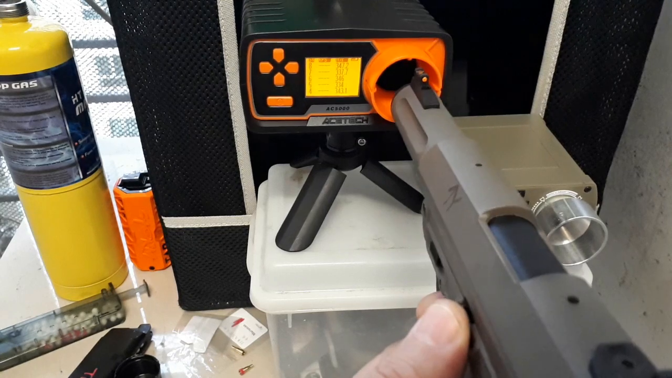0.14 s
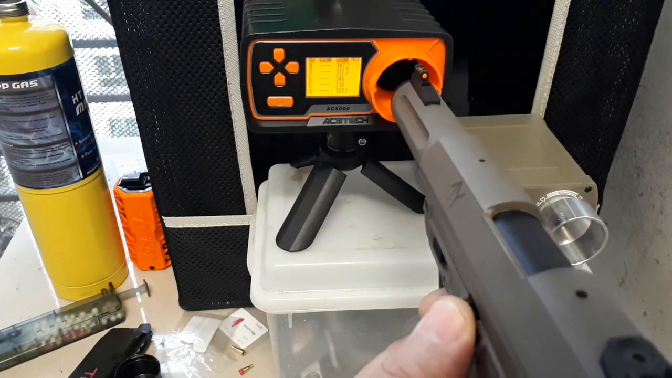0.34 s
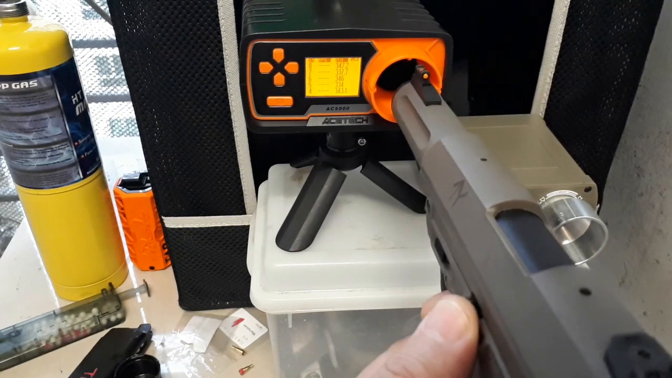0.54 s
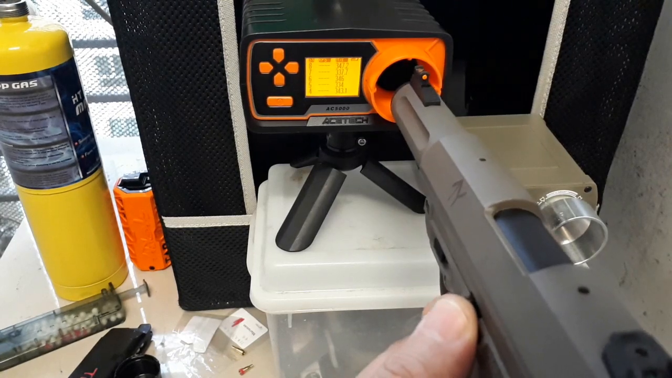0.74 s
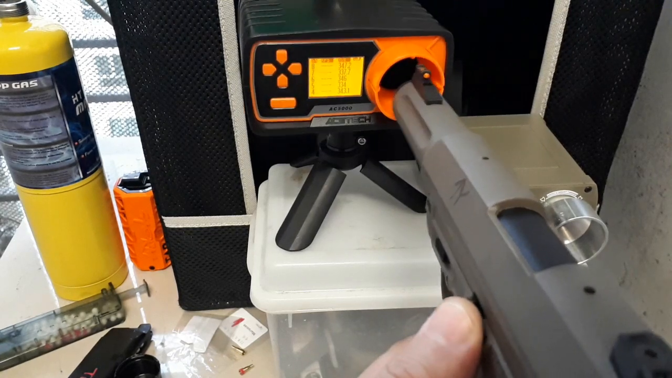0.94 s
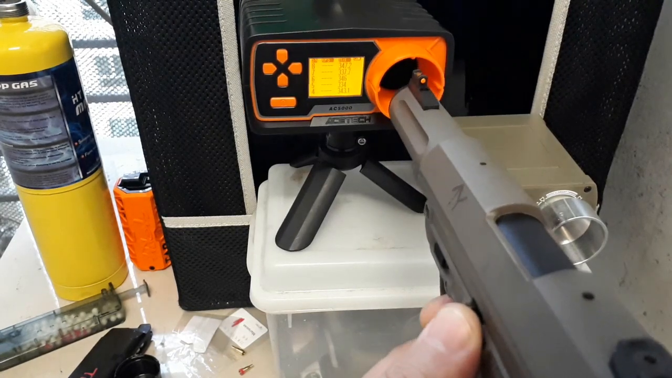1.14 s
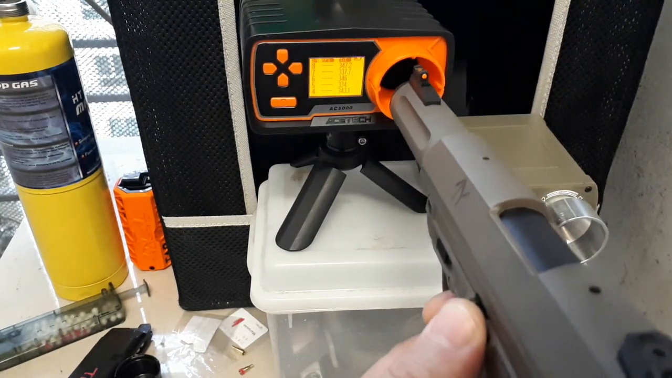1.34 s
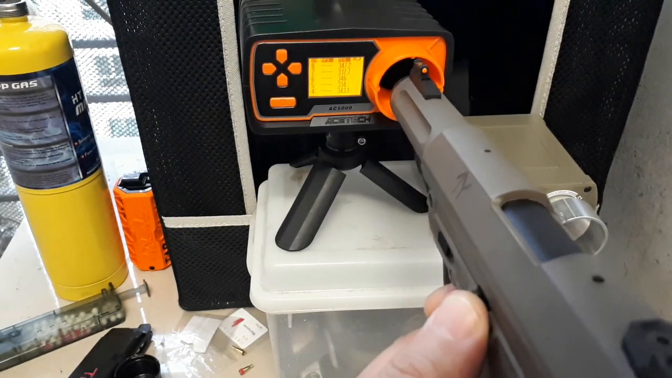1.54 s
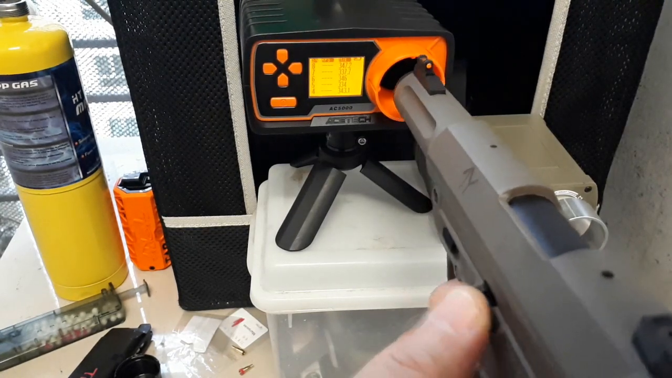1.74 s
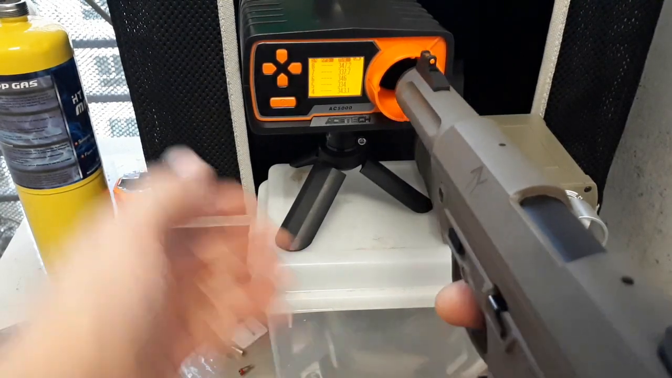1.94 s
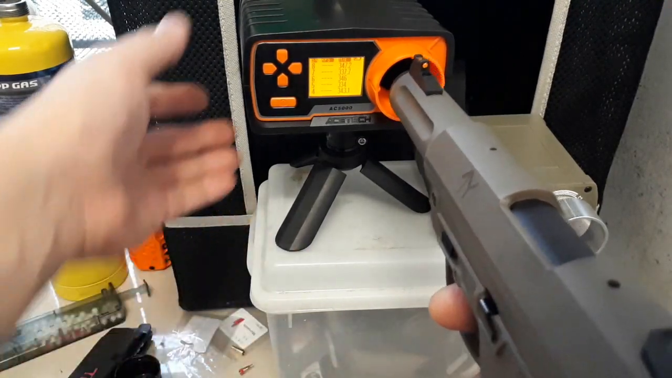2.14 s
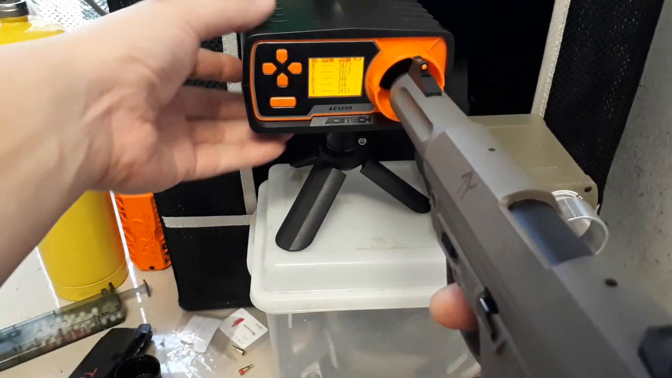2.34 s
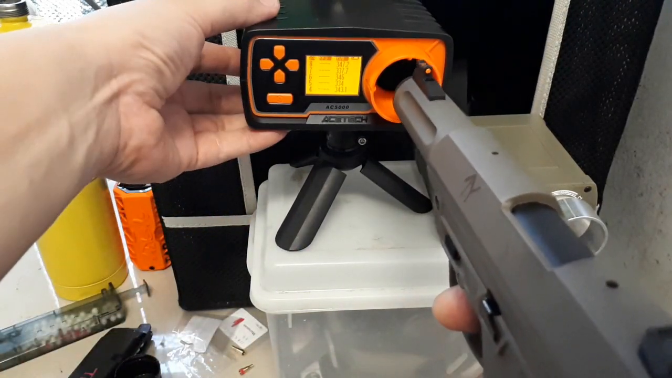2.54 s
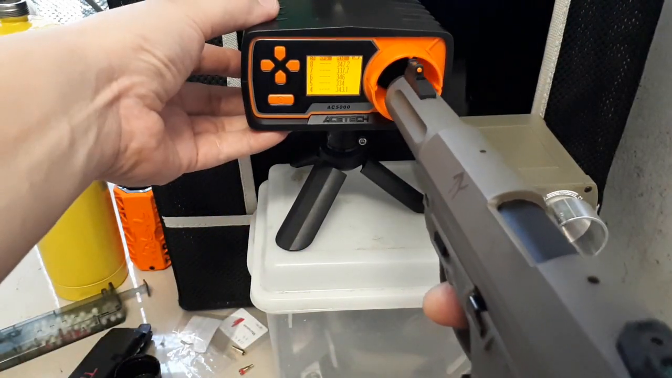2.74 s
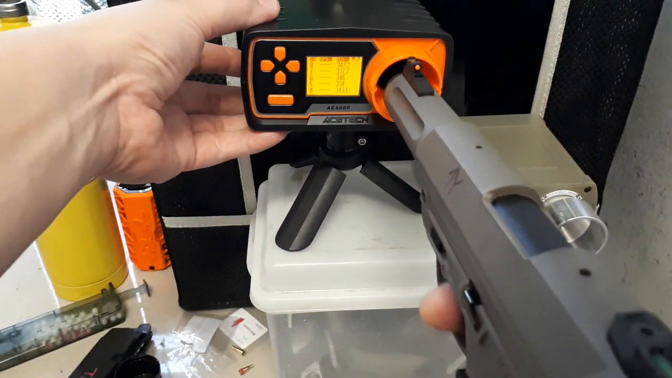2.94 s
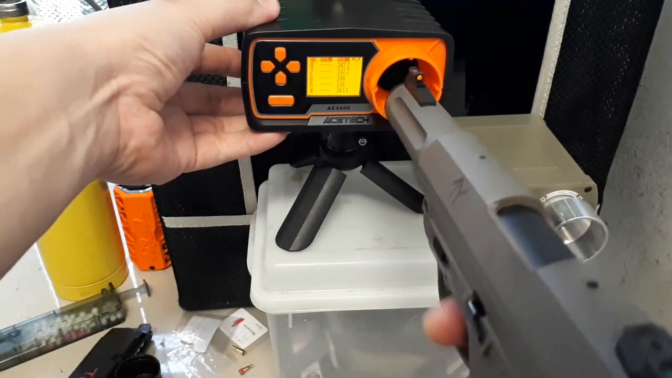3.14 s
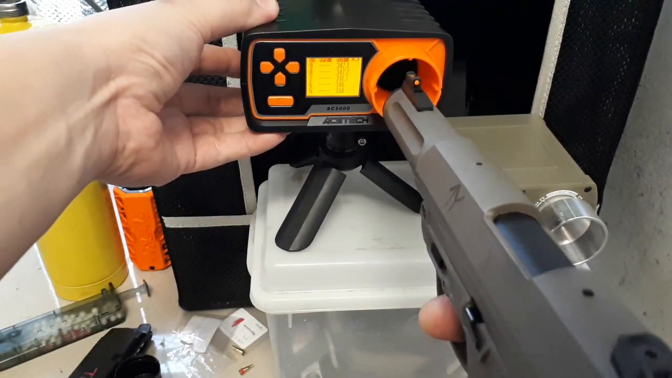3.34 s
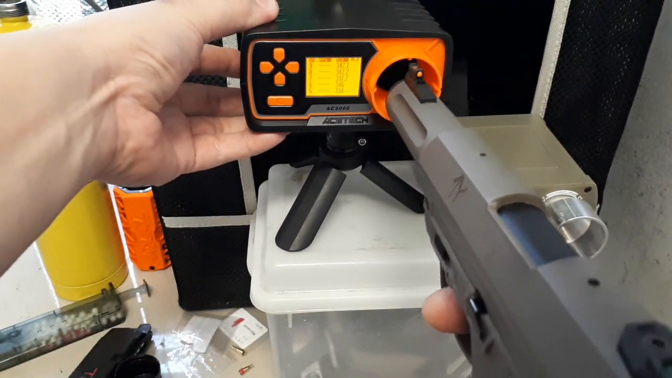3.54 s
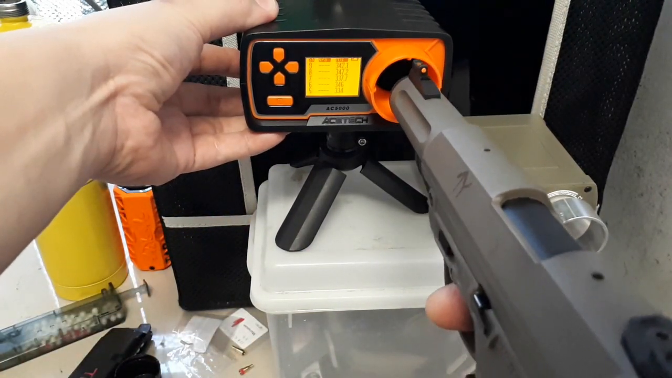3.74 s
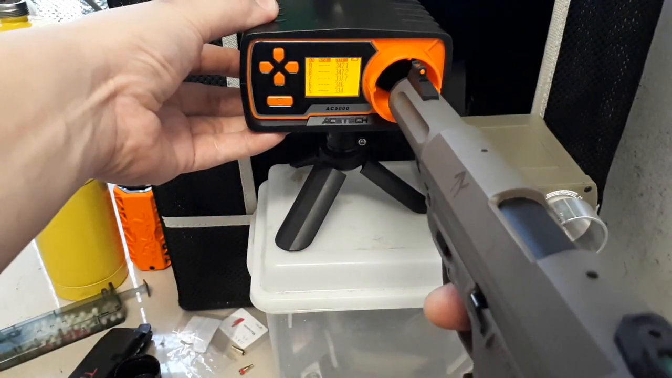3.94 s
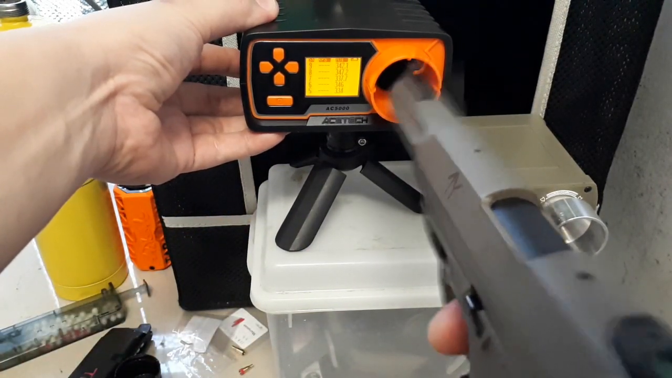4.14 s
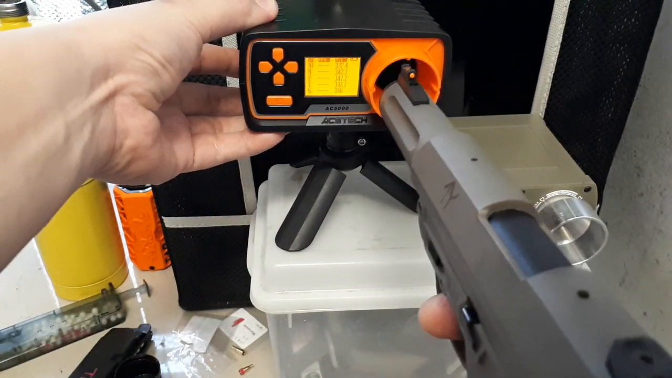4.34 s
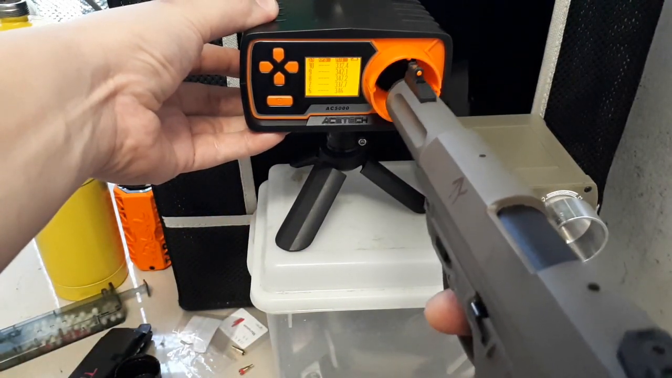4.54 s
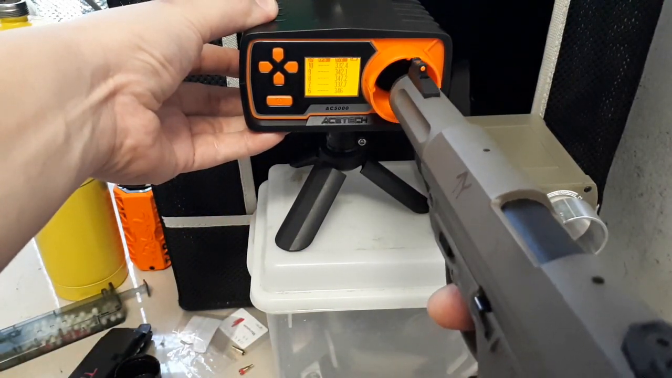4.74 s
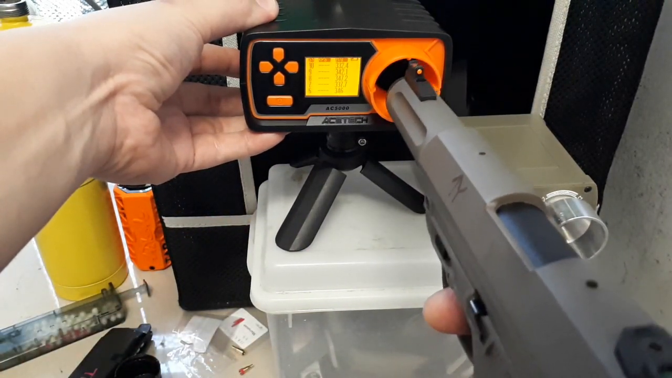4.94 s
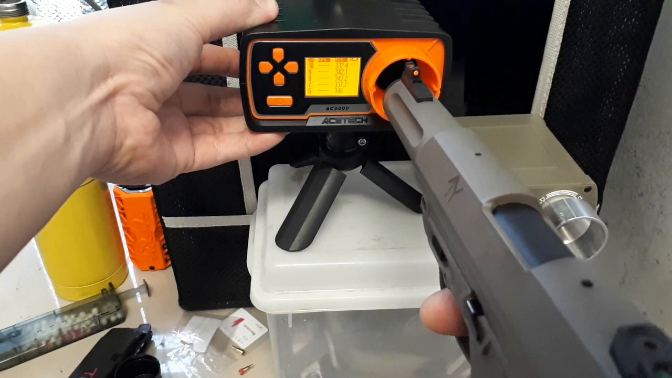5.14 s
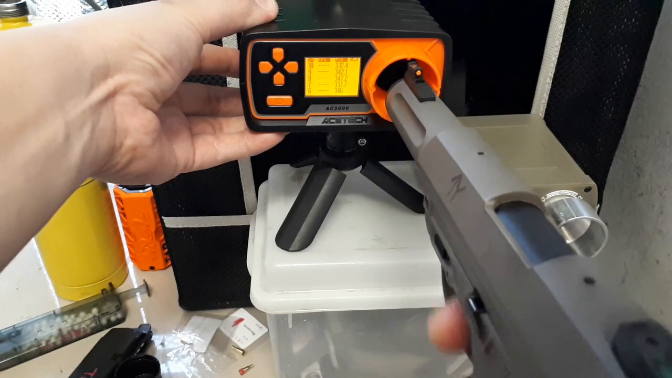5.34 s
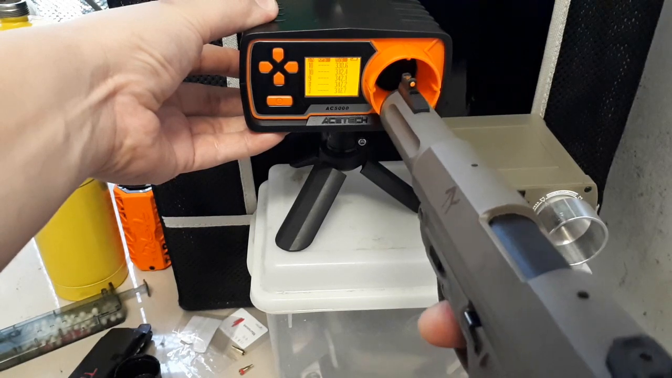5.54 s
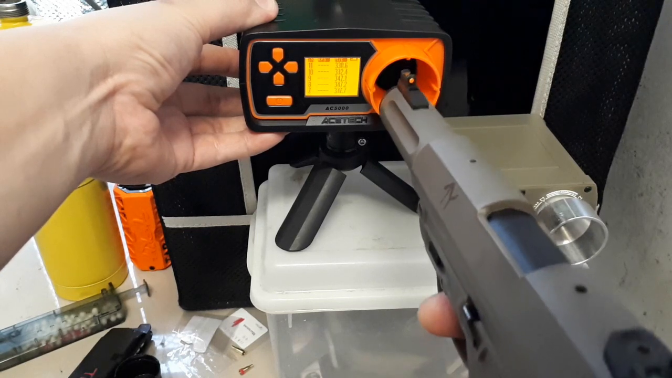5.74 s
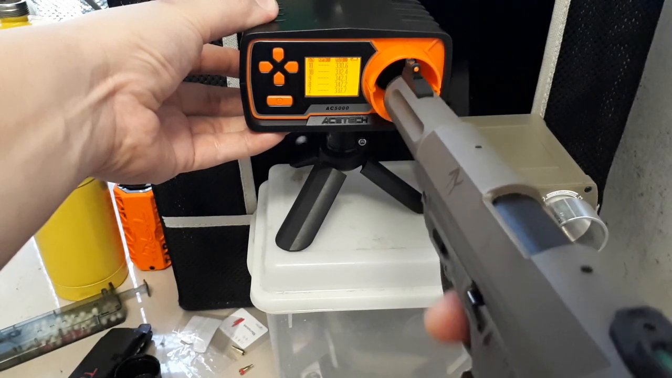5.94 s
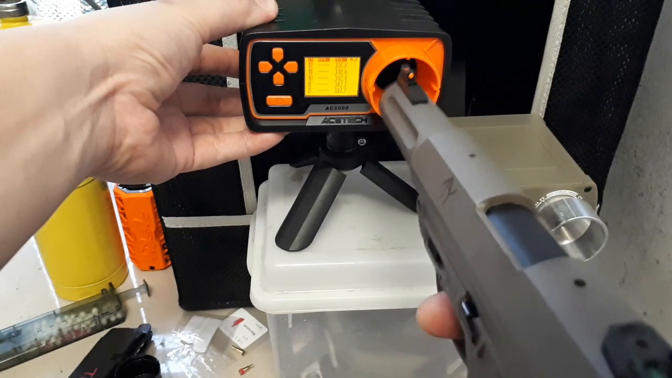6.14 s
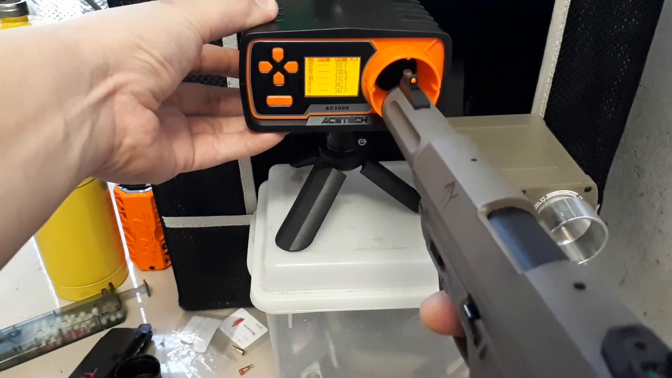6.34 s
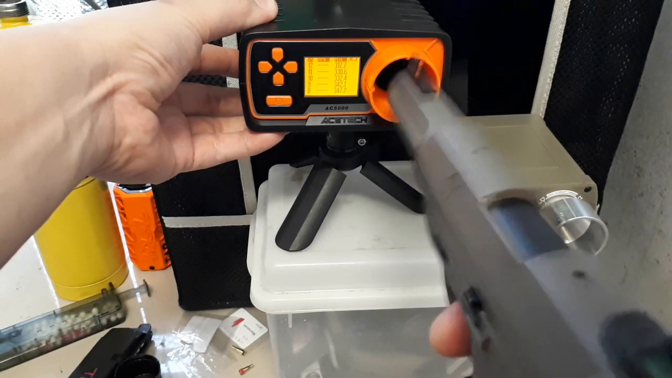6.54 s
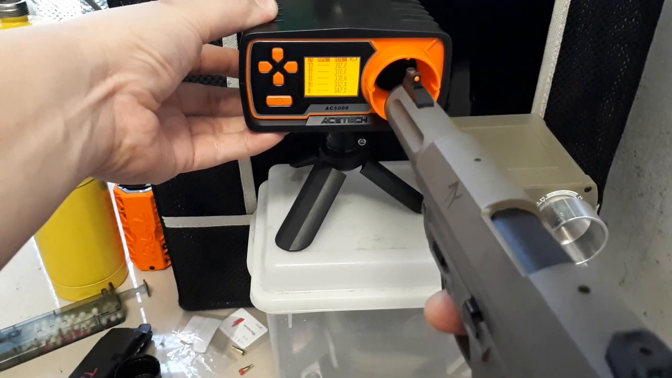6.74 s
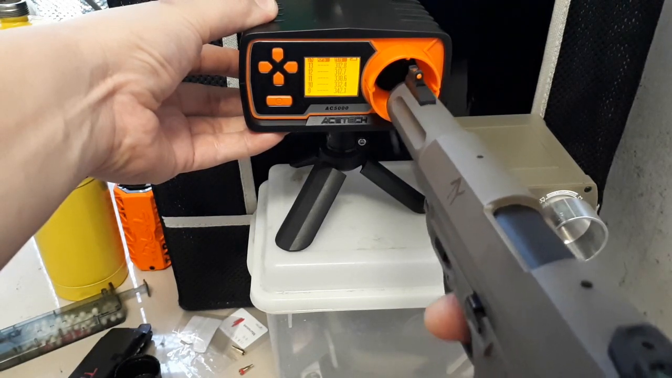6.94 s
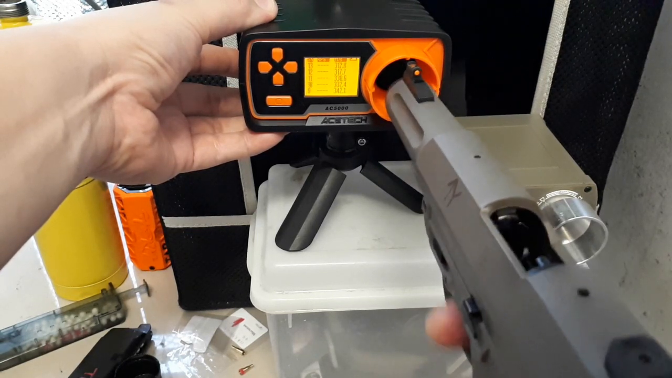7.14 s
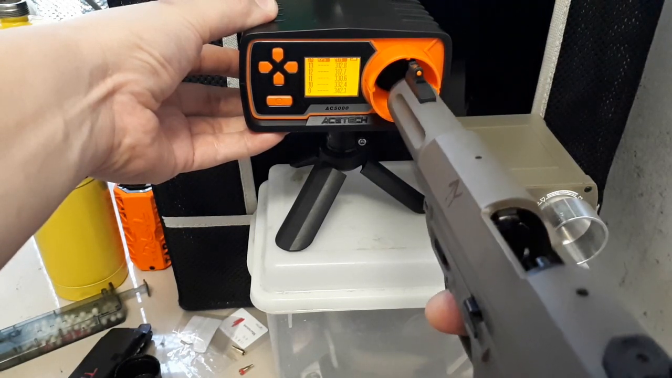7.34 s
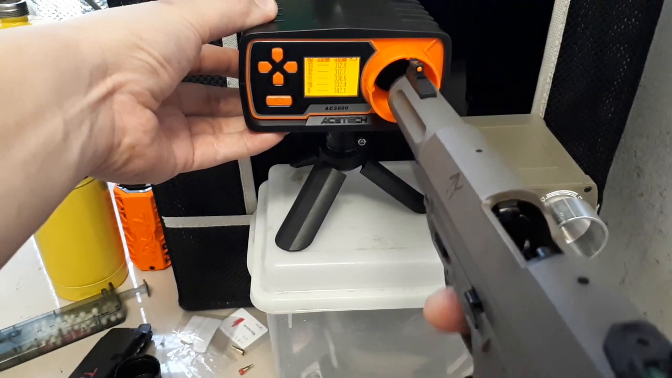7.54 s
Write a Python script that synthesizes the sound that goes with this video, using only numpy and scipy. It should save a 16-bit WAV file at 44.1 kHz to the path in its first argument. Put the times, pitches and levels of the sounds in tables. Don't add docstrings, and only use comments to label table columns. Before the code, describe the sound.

A small, cluttered room with low, soft far-traffic hum and very faint hiss; a trigger click and the dim ringing tail of an earlier shot open the scene. At 0.9 s a gas toy pistol fires close to the microphone: tiny hammer tick, explosive bright burst, dull slide knock, then a metallic clack about 0.13 s later, with short boxy ringing and a faint stairwell tail. A bright trigger click follows at 1.4 s. Through the pause the hum swells, with barely audible squeaks and a faint cloth brush near 2.6 s. More bangs come at 3.1 and 4.2 s, with clicks at 3.6 and 4.7 s. A small creak precedes the shot at 5.4 s, then rapid shots at 6.0, 6.6 and 7.1 s. Clicks come at 5.9 and just before the last shot; a final release clicks at 7.6 s. Blasts sound limited and gently clipped.

```python
import sys
import numpy as np
from scipy import signal
from scipy.fft import rfft, irfft, next_fast_len
from scipy.io import wavfile
from scipy.ndimage import uniform_filter1d, minimum_filter1d

SR = 44100
rng = np.random.default_rng(int(sys.argv[2]) if len(sys.argv) > 2 else 0)


def volts(x):
    e = np.asarray(x, float) / 20
    return 10 ** e


def master(y):
    cut = np.clip(np.atleast_2d(y).T, -1, 1)
    pcm = np.round(cut * 32767)
    wavfile.write(sys.argv[1], SR, pcm.astype(np.int16))


N = 335601

# start in seconds, blast peak in dB, hammer tick ahead in seconds,
# slide home after in seconds, force of the slide on its rear stop in dB.
SHOTS = [
    (.918, -3.5, .0375, .1353, -4.5),
    (3.085, -6.5, .0374, .1412, -15),
    (4.1617, -5.5, .0381, .1305, -5),
    (5.435, -7.5, .0328, .1294, -7),
    (6.0441, -4.5, .0318, .1217, -6.5),
    (6.572, -3.5, .0349, .1193, -6),
    (7.0952, -4, .035, .1248, -13.5),
]
# start in seconds, peak in dB, brightness in dB.
TRIGGER_RESETS = [
    (0.001, -35, 3.5),
    (1.361, -28, 12),
    (3.558, -30.5, -0.5),
    (4.653, -29, 3),
    (5.925, -31, 1),
    (7.042, -29, -2.5),
    (7.59, -30.5, 0.5),
]
# start in seconds, peak
# in dB, brightness in # dB.
CREAKS = [
    (2.8156, -60, -0.5),
    (2.9333, -62, 2),
    (5.393, -53.5, -4),
    (5.4029, -42, -4.5),
]
# start in seconds, length in seconds, first pitch in Hz,
# last pitch in Hz, level in dB.
SQUEAKS = [
    (1.15, .03, 3340, 3360, -64),
    (1.267, 0.033, 3200, 3250, -63.5),
    (1.82, 0.13, 2800, 2780, -71.5),
    (2.092, 0.27, 2650, 2650, -80),
    (2.45, 0.19, 3630, 3590, -83),
    (3.677, 0.28, 5200, 5450, -88),
    (3.895, 0.3, 2637, 2790, -75),
]
# climb start in seconds, climb time in seconds, height in dB, time
# in seconds, close to a shot, from which it holds briefly and then falls.
GAIN_SWELLS = [
    (-.6, .3, 12.5, -0.0968),
    (1.95, 0.38, 14, 3),
    (5.26, 0.21, 11.5, 5.5),
]

# frequency in Hz, level in dB per Hz.
GAS_COLOUR = [(25, -50), (70, -30), (130, -13), (300, -4.5), (600, -6), (800, -1), (1400, -0.5),
              (3200, -2.5), (3900, -11), (5500, -15), (9800, -17.5), (12300, -11.5), (15300, -20),
              (16500, -33.5)]
# frequency in Hz, level in dB per Hz.
STOP_COLOUR = [(300, -25), (1000, -7), (2000, 2), (3400, -2.5), (4500, -15), (12000, -26), (16500, -32)]
# frequency in Hz, level in dB per Hz.
METAL_COLOUR = [(300, -33.5), (700, -9), (1400, -2), (2300, -5), (3000, -8), (6500, -13.5), (9000, -11.5),
                (12500, -2), (15500, -9), (16500, -20)]
# frequency in Hz, level in dB per Hz.
SEAR_COLOUR = [(290, -38), (500, -7), (1190, -6.5), (1660, -0.5), (1890, 0), (5190, -10), (7170, -7.5),
               (9740, -17.5), (11600, -12), (15100, -16.5), (16500, -29.5)]
# frequency in Hz, level in dB per Hz.
HUM_COLOUR = [(12, -55), (20, -19.5), (48, -9), (86, -3.5), (135, 1), (244, -6.5), (382, -15), (440, -14),
              (535, -22.5), (709, -14), (1180, -21.5), (2660, -30), (4530, -50.5), (15200, -61),
              (16500, -72)]
# frequency in Hz, level in dB per Hz.
AFTER_COLOUR = [(300, -11), (1000, -4.5), (3300, 2), (4500, -9.5), (7000, -14.5), (10000, -30.5),
                (16500, -45.5)]
# frequency in Hz, level in dB per Hz.
CLOTH_COLOUR = [(2000, -20.5), (4500, -4), (6500, -1), (7500, -12), (12000, -30.5)]

# frequency in Hz, likeness from -1 to 1.
HUM_ALIKE = [(60, 1), (130, 0.98), (290, 0.9), (640, 0.8), (1410, -0.22), (3100, 0.3), (6820, 0.7),
             (15000, 0.98)]
# frequency in Hz, likeness from -1 to 1.
ROOM_ALIKE = [(60, 0.1), (130, 0.69), (290, 0.55), (640, 0.46), (1410, 0.035), (3100, 0.3), (6820, 0.5),
              (15000, 0.85)]
# frequency in Hz, time to fall by 60 dB in seconds.
ROOM_DECAY = [(60, .2), (200, 0.34), (500, 0.23), (1500, 0.21), (4000, 0.21), (9000, 0.18), (16000, .16)]
# frequency in Hz, time to fall by 60 dB in seconds.
STAIRWELL_DECAY = [(300, 0.63), (1500, 1), (4000, 0.97), (7000, 0.8), (9000, 0.93), (14000, 0.13)]

# pitch in Hz, level in dB,
# time to fall by 60 dB in seconds, onset in seconds.
RINGS = [(142.5, -17.5, .36, .03), (208, -3.5, 0.05, .006), (260, -4.5, 0.062, .006),
         (310.5, -22, 0.16, 0.0096), (410, -24.5, 0.27, .015), (448, -21, 0.23, 0.0032),
         (607, -19.5, 0.15, .006), (743.5, -7, 0.085, .007), (866, -8.5, 0.069, 0.0069),
         (973, -11, 0.061, .006), (1355, -13.5, .06, 0.0034), (2600, -57, 0.74, .01), (3962, -51.5, 1, .01)]
# pitch in Hz, level in dB, time to fall by 60 dB in seconds.
CAN = (1705, -62, 3.5)
# pitch in Hz, level in dB, time to fall by 60 dB in seconds,
# delay in seconds.
FRAME_RINGS = [(3330, -7.5, .01, 0), (2340, -11, 0.0079, 0.0092), (1550, -11.5, 0.018, 0.0013)]
# pitch in Hz, level in dB, time to fall by 60 dB in seconds,
# delay in seconds.
BREECH_RINGS = [(1350, -11, .01, .0003)]
# pitch in Hz, level in dB, time to fall by 60 dB in seconds,
# delay in seconds.
BUFFER_RINGS = [(2000, 10, .004, 0), (3100, 5, .003, .0002)]

SLAM_AFTER_S = .037
HOME_DB, HOME_BRIGHT_DB, HAMMER_DB = -18, -0.2, -53
RINGING_DB, RATTLE_DB, PUSH_DB = 0.9, -2, -11
PUSH_PER_GAIN, RATTLE_PER_GAIN, RINGING_PER_GAIN = -0.5, .15, -0.23
PUSH_LOSS_DB = .8
REST_DB, GAIN_HOLD_S, GAIN_FALL_S = -1.3, 0.037, 0.18
BRUSH_S, BRUSH_RISE_S, BRUSH_FALL_S, BRUSH_DB = 2.65, .3, 0.08, -90.5
TOP_HZ = 15900


def along(points, hz):
    f, v = np.transpose(points)
    return np.interp(np.log(hz + 1), np.log(f + 1), v)


def unit(x):
    return x / np.sqrt(np.mean(x ** 2) + 1e-20)


def kernel(spectrum, tilt_db=0, size=2048):
    hz = np.fft.rfftfreq(size, 1 / SR)
    level_db = along(spectrum, hz) + tilt_db * np.clip(hz / 8000 - .5, 0, 1)
    cepstrum = irfft(np.log(volts(level_db) + 1e-5))
    folded = np.concatenate([cepstrum[:1], 2 * cepstrum[1:size // 2], np.zeros(size // 2)])
    knock = irfft(np.exp(rfft(folded)))
    return knock / np.linalg.norm(knock)


def pair(n, alike, spectrum=((1, 0), (2, 0))):
    m = next_fast_len(n, True)
    hz = np.fft.rfftfreq(m, 1 / SR)
    turn = np.arccos(np.clip(along(alike, hz), -1, 1)) / 2
    coloured = rfft(rng.standard_normal((2, m))) * volts(along(spectrum, hz))
    mid, side = irfft(coloured * [np.cos(turn), np.sin(turn)], m)
    return unit(np.array([mid + side, mid - side])[:, :n])


def add(track, s, sound):
    part = track[..., max(round(s * SR), 0):][..., :sound.shape[-1]]
    part += sound[..., :part.shape[-1]]


def gain_at(s):
    db = REST_DB
    for start, climb, height_db, shot in GAIN_SWELLS:
        rise = np.sin(np.pi / 2 * np.clip((s - start) / climb, 0, 1)) ** 2
        since_release = np.maximum(s - shot - GAIN_HOLD_S, 0)
        db = db + height_db * rise * np.exp(-(since_release / GAIN_FALL_S) ** 1.2)
    return db


def heard(contacts):
    return [(s, db + gain_at(s), *rest) for s, db, *rest in contacts]


def clicks(events, spectrum, t60, bounce_s, bounce_db, offset_db, modes=()):
    out, t = np.zeros(N), np.arange(SR // 10) / SR
    for s, db, *bright_db in events:
        bounce = volts(bounce_db - 60 * (t - bounce_s) / t60) * (t > bounce_s)
        shape = volts(-60 * t / t60) + bounce
        contact = shape * rng.standard_normal(len(t))
        burst = np.convolve(contact, kernel(spectrum, sum(bright_db)))[:len(t)]
        burst = burst / np.abs(burst).max()
        for hz, level_db, ring_s, delay in modes:
            age = np.maximum(t - delay, 0)
            fade = volts(level_db + rng.normal(0, 4) - 60 * age / ring_s)
            burst = burst + fade * np.sin(2 * np.pi * hz * rng.normal(1, 0.011) * age)
        add(out, s, volts(db + offset_db - gain_at(s)) * burst)
    return out


def reverb(x, t60s, seconds, count):
    out = np.zeros((2, N))
    for at in np.array_split(np.arange(N), count):
        hz, t, z = signal.stft(pair(int(seconds * SR), ROOM_ALIKE), SR, nperseg=256)
        fading = z * volts(-60 * t / along(t60s, hz)[:, None])
        tail = signal.istft(fading, SR, nperseg=256)[1]
        tail = tail / np.sqrt(np.sum(tail ** 2) / 2)
        add(out, at[0] / SR, signal.fftconvolve(x[:, at], tail, axes=1))
    return out


def traffic_hum():
    z = signal.stft(pair(N, HUM_ALIKE, HUM_COLOUR), nperseg=512)[2]
    patches = rng.standard_normal(z.shape[1:])
    patches = uniform_filter1d(uniform_filter1d(patches, 5, 0), 10, 1)
    patchy = signal.istft(z * volts(1.0 * unit(patches)), nperseg=512)[1][:, :N]
    return volts(-54) * unit(patchy)


def microphone_hiss():
    colour = [(3000, -14), (9000, -5.5), (13000, -0.5), (16000, -2.5)]
    return volts(-94.5) * pair(N, HUM_ALIKE, colour)


def earlier_shot():
    hz, db, t60 = CAN
    t = np.arange(N) / SR
    beat = np.cos(2 * np.pi * 1.8 * t)
    wander = np.cumsum(rng.normal(0, .035, N))
    can = volts(db - 60 * t / t60) * beat * np.sin(2 * np.pi * hz * t + wander)
    return can + volts(-62.0 - 60 * t / 1.2) * pair(N, ROOM_ALIKE, AFTER_COLOUR)


def trigger_resets():
    return clicks(TRIGGER_RESETS, SEAR_COLOUR, t60=.035, bounce_s=0.012, bounce_db=-8, offset_db=-1.5,
                  modes=FRAME_RINGS)


def hammer_ticks_and_creaks():
    hammer = [(s - ahead, HAMMER_DB) for s, _, ahead, _, _ in SHOTS]
    return clicks(heard(hammer) + CREAKS, SEAR_COLOUR, t60=0.014, bounce_s=0.0034, bounce_db=-9.5,
                  offset_db=-1.5)


def push(t, tau):
    u = np.maximum(t, 0) / tau
    return u * (2 - u) * np.exp(-u) * 2


def blasts():
    gas, rings = np.zeros((2, N)), np.zeros((2, N))
    t, short = np.arange(SR) / SR, np.arange(SR // 5) / SR
    lead = .012
    spread = 0.2 * rng.choice([-1, 1], (len(RINGS), 1)) * [1, -1]
    for fired, (s, db, *_) in enumerate(SHOTS):
        lift_db = gain_at(s) - REST_DB
        ringing_db = RINGING_DB + RINGING_PER_GAIN * lift_db
        rattle_db = RATTLE_DB + RATTLE_PER_GAIN * lift_db
        push_db = PUSH_DB - PUSH_LOSS_DB * fired + PUSH_PER_GAIN * lift_db

        opening = np.minimum(short / lead, 1) ** 6
        opening = opening * volts(-60 * np.maximum(short - lead - .006, 0) / 0.048)
        rattle = volts(rattle_db + 9 * rng.standard_normal(len(short)))
        crackle = 1 + rattle * (rng.random(len(short)) < .02)
        rush = opening * crackle * pair(len(short), ROOM_ALIKE)
        jet = signal.fftconvolve(rush, kernel(GAS_COLOUR)[None], axes=1)
        add(gas, s - lead, volts(db - 3.5) * jet)

        muzzle = push(short - np.array([[.004], [.005]]), tau=0.0008)
        wall = push(short - np.array([[.012], [.010]]), tau=0.0018)
        add(rings, s, volts(push_db + 7.0) * (muzzle - volts([[-6], [-12]]) * wall))

        for (hz, level_db, t60, onset), phase in zip(RINGS, spread):
            age = t[:round(min(t60, 1) * SR)]
            wander = np.cumsum(rng.normal(0, 5e-6 * hz, len(age)))
            fade = volts(level_db + ringing_db + rng.normal(0, 1.8) - 60 * age / t60)
            swell = fade * (1 - np.exp(-(age / onset) ** 2))
            add(rings, s - .002, swell * np.sin(2 * np.pi * hz * age + wander + phase[:, None]))
    return gas, rings


def slide_slams():
    stops = [(s + SLAM_AFTER_S, force_db) for s, _, _, _, force_db in SHOTS]
    return clicks(heard(stops), STOP_COLOUR, t60=.002, bounce_s=.001, bounce_db=-14, offset_db=-9,
                  modes=BUFFER_RINGS)


def slide_returns():
    homes = [(s + after, HOME_DB, HOME_BRIGHT_DB) for s, _, _, after, _ in SHOTS]
    return clicks(heard(homes), METAL_COLOUR, t60=0.008, bounce_s=0.002, bounce_db=-9, offset_db=1.0,
                  modes=BREECH_RINGS)


def squeaks():
    out = np.zeros(N)
    for s, length, from_hz, to_hz, db in SQUEAKS:
        n = round(length * SR)
        steps = 2 * np.pi * np.linspace(from_hz, to_hz, n) / SR
        phase = np.cumsum(steps + rng.normal(0, 0.053, n))
        add(out, s, volts(db) * np.hanning(n) ** 0.35 * np.sin(phase))
    return out


def sleeve_brush():
    t = np.arange(N) / SR
    away = np.maximum((BRUSH_S - t) / BRUSH_RISE_S, (t - BRUSH_S) / BRUSH_FALL_S)
    return volts(BRUSH_DB - 8.7 * away ** 2) * pair(N, HUM_ALIKE, CLOTH_COLOUR)


def scene():
    gas, rings = blasts()
    slams, returns = slide_slams(), slide_returns()
    trigger = trigger_resets() + hammer_ticks_and_creaks()
    parts = slams + returns + trigger

    to_room = volts(.5) * gas + volts(-5.5) * returns + volts(-4.0) * trigger + volts(-7) * slams
    room = reverb(to_room, ROOM_DECAY, seconds=.5, count=9)
    stairwell = volts(-32) * reverb(to_room, STAIRWELL_DECAY, seconds=1.5, count=2)

    pistol = gas + parts + volts(-6) * rings + room + stairwell
    background = earlier_shot() + squeaks() + traffic_hum() + microphone_hiss() + sleeve_brush()
    return pistol + background


def top_cut(x):
    return signal.sosfilt(signal.butter(12, 16990, fs=SR, output="sos"), x)


def record(dry):
    bass_cut = signal.butter(2, 55, 'high', fs=SR, output='sos')
    x = signal.sosfilt(bass_cut, dry)
    x = x * volts(gain_at(np.arange(N) / SR))
    needed = np.minimum(1, volts(1.0) / (np.abs(x).max(axis=0) + 1e-9))
    span = round(.014 * SR)
    x = x * uniform_filter1d(minimum_filter1d(needed, span), span)
    x = x / (1 + np.abs(x) ** 8) ** (1 / 8)
    band_limit = signal.ellip(10, .5, 45, TOP_HZ, fs=SR, output='sos')
    x = signal.sosfilt(band_limit, x)
    return top_cut(x)


dry = scene()
out = record(dry)
master(out)
```